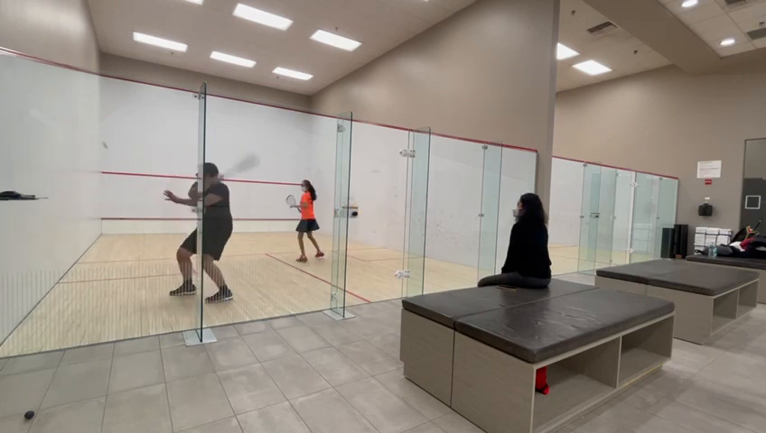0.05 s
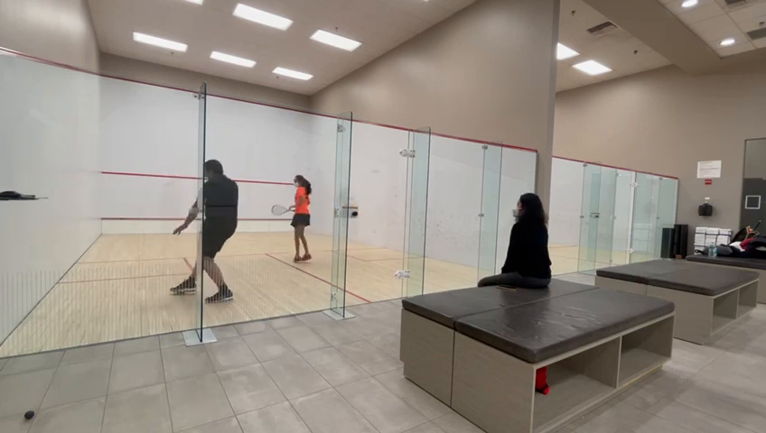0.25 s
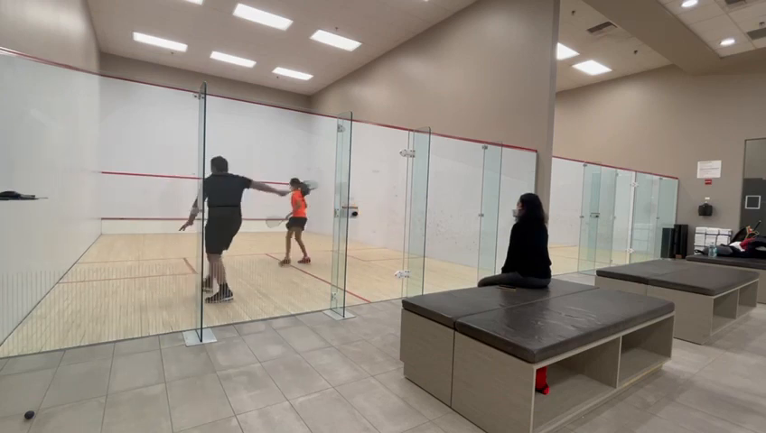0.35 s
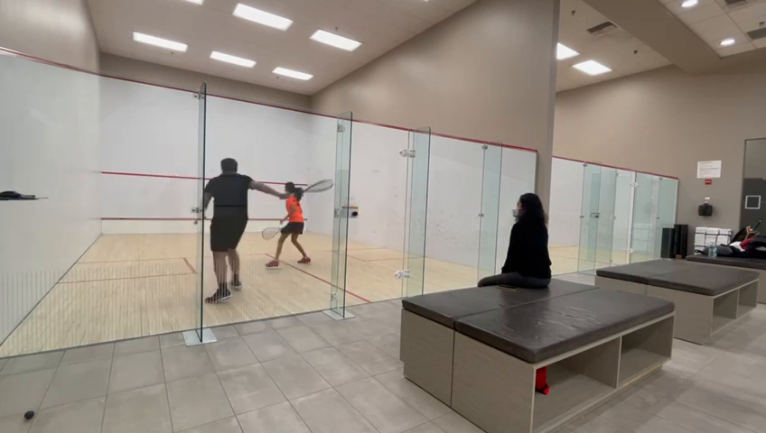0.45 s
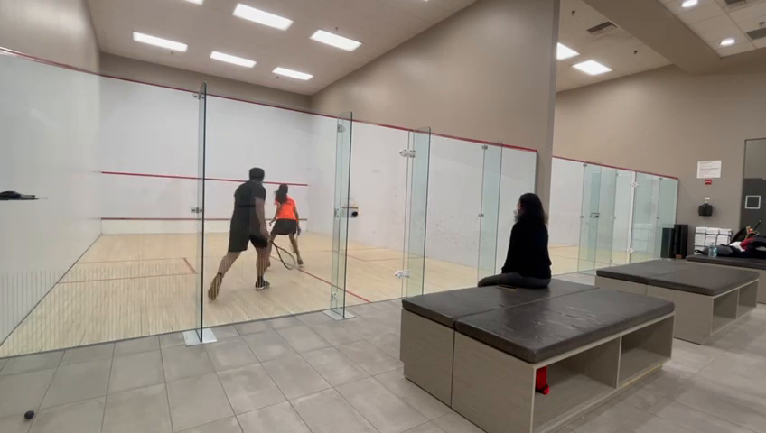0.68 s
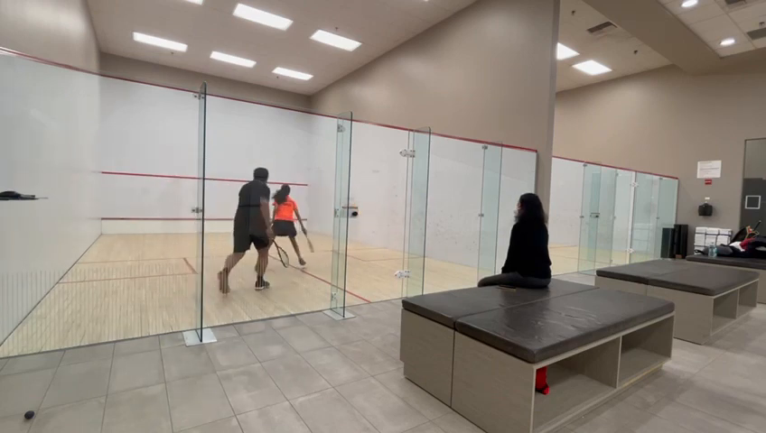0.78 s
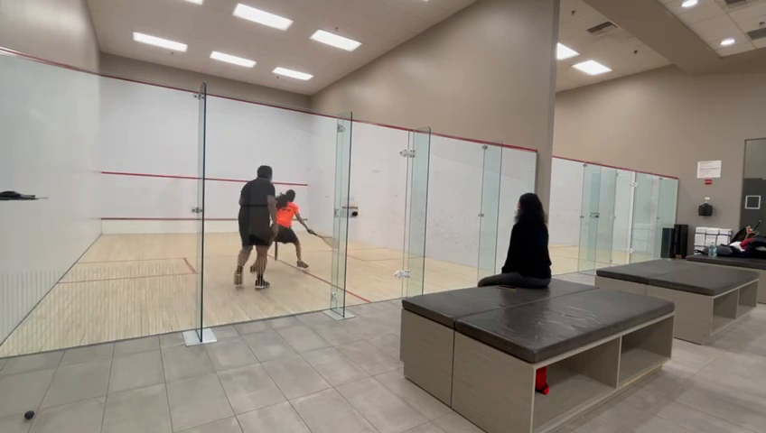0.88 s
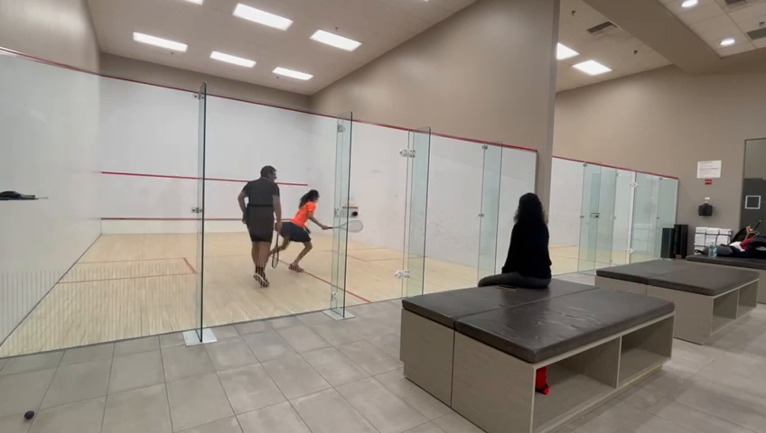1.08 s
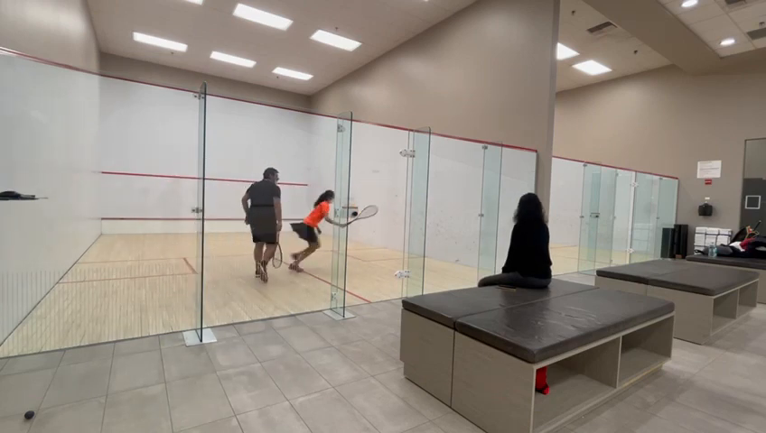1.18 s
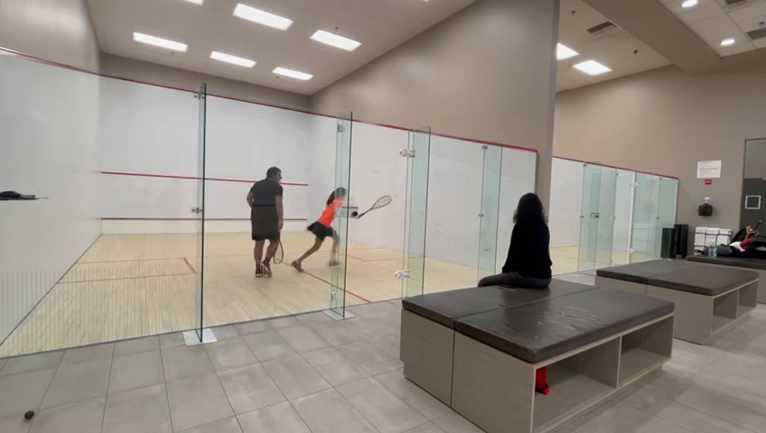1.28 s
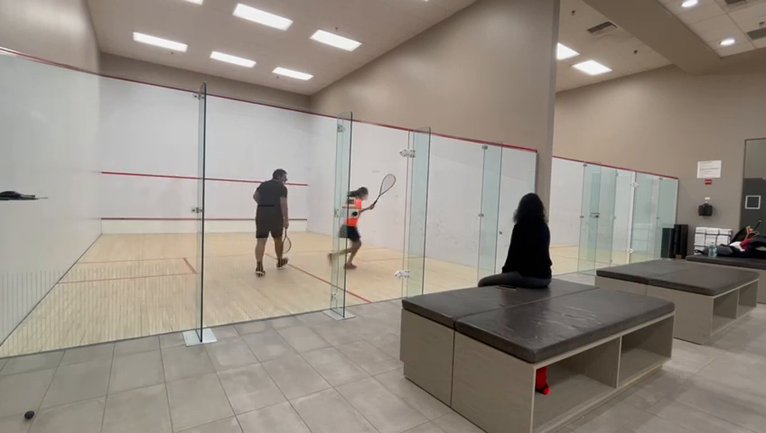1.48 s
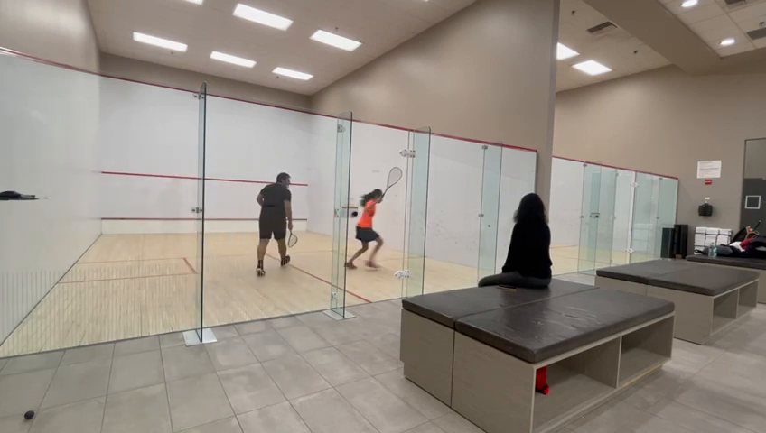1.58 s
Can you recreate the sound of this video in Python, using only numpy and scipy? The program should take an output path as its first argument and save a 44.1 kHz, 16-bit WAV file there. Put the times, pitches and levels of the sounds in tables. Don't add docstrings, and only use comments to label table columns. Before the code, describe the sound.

Squash rally: sharp racket hit, loud wall smack, dull bounces and footsteps in a reverberant hall

```python
import sys
import numpy as np
from scipy import signal
from scipy.fft import rfft, irfft, next_fast_len
from scipy.io import wavfile
from scipy.ndimage import uniform_filter1d, minimum_filter1d

SR = 44100
rng = np.random.default_rng(int(sys.argv[2]) if len(sys.argv) > 2 else 0)


def waveform_to_disk(signal):
    frames = np.transpose(np.atleast_2d(signal))
    scaled = np.clip(frames, -1, 1) * 32767
    samples = np.round(scaled).astype(np.int16)
    wavfile.write(sys.argv[1], SR, samples)


def field_ratio(decibels):
    return 10 ** (np.asarray(decibels, dtype=float) / 20)


N = 72765

# [t/s, level/dB, cluster t60/s, hall level/dB, left over right/dB]
RACKET_HITS = [
    (.233, -16.5, 0.025, -21, 6),
]
SLAPS = [
    (.285, -18, 0.19, -22, 0.5),
    (.304, -43.5, 0.23, -38.5, 31),
]
WALL_HITS = [
    (.398, -12.5, 0.022, -21, 0.65),
]
WALL_RINGS = [
    (.407, -11.5, 0.095, -26.5, 0.49),
]
BOUNCES = [
    (.49, -23, 0.12, -31, 1),
    (.545, -22.5, 0.31, -60, 1.8),
    (.615, -44, 0.082, -51, 1),
    (.865, -32, 0.072, -30, 3.2),
    (.99, -30, 0.31, -32, 0.8),
    (1.1, -35.5, 0.73, -36.5, 0.81),
]
SCUFFS = [
    (.799, -69, 0.074, -56, 3.8),
    (.9, -63, .08, -59.5, 2),
    (1.005, -71, 0.089, -56, 2.3),
    (1.042, -67, 0.081, -55, 3),
    (1.186, -46.5, 0.02, -48, 3.3),
    (1.468, -48.5, 0.18, -58, 2.5),
    (1.58, -70, 0.17, -68, 3),
]
# racket, slap, wall, ring, bounce, scuff [rise/s]
RISES = [0.00067, 0.015, 0.003, 0.0046, 0.016, 0.0023]
# [t/s, level/dB, t60/s, knock level/dB]
STEPS = [(0.0, -37.5, 0.89, -3.5), (0.075, -28.5, 0.48, -12), (.135, -31, 0.52, -5),
         (0.232, -38.5, 0.74, 8), (.4, -41, 0.95, 8.5), (.53, -43.5, 0.45, -1), (.65, -53, 0.18, -17),
         (.76, -42.5, .3, -24), (0.929, -39.5, 0.79, -4.5), (1.03, -36.5, 0.83, -32),
         (1.09, -32, 0.23, -23), (1.189, -39, 0.99, -0.5), (1.249, -40, 0.33, 5.5), (1.31, -46, 0.57, 3),
         (1.417, -32.5, 0.76, 0.5), (1.492, -33.5, 0.62, -1), (1.549, -32, 0.28, -18),
         (1.61, -42, 0.24, 5.5)]
# [t/s, f/Hz, level/dB, t60/s, lead of the left/rad]
PANELS = [(.236, 6500, -17, 0.067, 2.14), (0.223, 1150, -21, 0.078, 0.74), (.237, 1161, -13, 0.075, 1),
          (.244, 348, -15, 0.11, .2), (.272, 356.7, -11, 0.11, 0.24), (.284, 351.4, -1, 0.052, 0.22),
          (.287, 1050, -8.5, 0.057, 1.1), (0.297, 1107, -17.5, 0.084, 0.68),
          (.306, 433, -15.5, 0.087, 0.23), (.333, 380, -17, .05, .2), (0.336, 1254, -17, 0.088, 0.67),
          (0.345, 328, -18.5, 0.061, 0.23), (.36, 401, -13, 0.064, 0.22), (.392, 1230, -10, 0.051, .8),
          (.394, 880, -17, 0.089, 1.1), (.401, 271, -13.5, 0.094, 0.14), (.404, 1882, -9.5, 0.055, 0.56),
          (.405, 2397, -18.5, 0.065, 0.91), (.408, 1510, -15, 0.06, 0.69), (.403, 2113, -8, 0.039, .8),
          (0.401, 3420, -17.5, 0.068, 0.74), (0.419, 1027, -14.5, 0.077, 1.5),
          (0.419, 148, -30.5, 0.17, 0.086), (.452, 642, -9, 0.036, .5), (.462, 415, -12, 0.057, 0.31),
          (.494, 1150, -19, 0.091, .8), (1.005, 4250, -49, .05, 0.72), (1.18, 783, -28, 0.13, 1.2),
          (1.185, 3930, -36, 0.021, 0.74), (1.186, 4700, -49, .02, .8), (1.187, 6500, -49, .02, .8)]
# [f/Hz, level per Hz/dB]
RACKET_TONE = [(88, -48.5), (150, -4.5), (650, -5), (1170, -3.5), (1790, -12), (3170, -11.5), (5530, -17.5),
               (6530, -6.5), (7430, -23), (10000, -23.5), (12000, -21), (13000, -38), (16200, -84),
               (22000, -120)]
SLAP_TONE = [(88, -77.5), (150, -32.5), (371, -5.5), (558, -13.5), (1090, -1.5), (1760, -10), (8160, -25),
             (9460, -26.5), (12500, -136), (16200, -166), (22000, -120)]
WALL_TONE = [(88, -49), (150, -9.5), (1130, -6), (2200, -6), (3170, -11.5), (4950, -13.5), (5530, -14.5),
             (8620, -11.5), (10200, -15), (10800, -50), (11600, -48), (12500, -82), (16200, -99),
             (22000, -120)]
RING_TONE = [(88, -59.5), (150, -15), (919, 0), (1630, -15.5), (1930, -3), (3750, -21.5), (9630, -22.5),
             (11000, -60.5), (12500, -92), (16200, -128), (22000, -120)]
BOUNCE_TONE = [(150, -10.5), (350, -8), (800, 4), (1400, -1.5), (2200, -8.5), (3200, -16.5), (4500, -31.5),
               (12000, -76.5)]
SCUFF_TONE = [(500, -31), (2000, 1.5), (4000, 4), (6500, 0), (9000, -3.5), (12500, 0.5)]
AIR_TONE = [(18, -36), (30, -16.5), (69, -16.5), (256, -17), (306, -20), (905, -18.5), (2550, -36.5),
            (8770, -55), (12500, -45), (16200, -109), (22000, -120)]
# [f/Hz, width/Hz, gain/dB]
RACKET_MODES = [(6500, 590, -4.5), (8150, 760, 16.5), (1150, 150, -1.5), (2850, 1500, 2.5)]
SLAP_MODES = [(342, 150, 1), (1040, 50, -1.6), (450, 37, 0.93)]
RING_MODES = [(2110, 81, 3.2), (1040, 650, 0.19), (1480, 320, -1)]
PORT_NOTCHES = [(5580, 355, -8), (7380, 270, -12), (10600, 95, -1.5)]
# [f/Hz, t60/s, level/dB, left-right likeness (-1 to 1), left over right/dB]
HALL = [(30, 1.2, -15, 0.85, -4), (60, 1.2, -5, 0.94, -4), (186, 2.1, -12, 0.74, -0.5),
        (375, 1.61, 3.5, 0.45, 0), (743, 2.43, 2.5, -0.25, 2), (1526, 2.3, 1, 0.087, 3),
        (2250, 1.54, -1, -0.15, 3), (3260, 1.35, -5.5, -0.15, 2.5), (6120, 0.8, -5.5, 0.099, 8.5),
        (10600, 0.38, -3, -0.27, -2.5)]
# [t/s, level/dB]
AIR_LEVEL = [
    (.25, -3.5),
    (.7, -3),
    (.88, -3),
    (1.2, 2),
]
# [t/s, f/Hz, level/dB, length/s, left over right/dB]
BIRDIES = [
    (.408, 11140, -45.5, 0.022, 8),
    (0.445, 11560, -52, 0.013, 6),
    (.548, 11570, -63, 0.02, 8),
]

SIZE = next_fast_len(N + 8192, True)
HZ = np.maximum(np.arange(SIZE // 2 + 1) * SR / SIZE, 1)
T = np.arange(N) / SR


def unit(x):
    return x / np.sqrt(np.mean(x ** 2))


def read(table, hz, axis=1):
    table = np.array(table)
    return np.interp(np.log(hz), np.log(table[:, 0]), table[:, axis])


def bumps(modes):
    return sum(db / (1 + (2 * (HZ - hz) / width_hz) ** 2) for hz, width_hz, db in modes)


def colour(x, db):
    gain = field_ratio(db)
    gain = gain / np.sqrt(np.mean(gain ** 2))
    return irfft(rfft(x, SIZE) * gain, SIZE)[..., :N]


def pan(db):
    return field_ratio(np.array([[db], [-db]]) / 2)


def pair(a, b):
    likeness = np.clip(read(HALL, HZ, axis=3), -.999, .999)
    balance = field_ratio(read(HALL, HZ, axis=4) / 2)
    mid = rfft(a, SIZE) * np.sqrt((1 + likeness) / 2)
    side = rfft(b, SIZE) * np.sqrt((1 - likeness) / 2)
    return irfft(np.array([(mid + side) * balance, (mid - side) / balance]), SIZE)[:, :N]


def noise_pair():
    return pair(*rng.standard_normal((2, N)))


def echoes():
    echoes_per_s, scatter_db = 9000, 3.5
    happens = rng.random((2, N)) < echoes_per_s / SR
    sign = rng.choice([-1, 1], (2, N))
    return unit(happens * sign * field_ratio(scatter_db * rng.exponential(size=(2, N))))


def hall_bands():
    out = []
    for hz in 45 * 2 ** np.arange(0, 8.6, .5):
        window = np.cos(np.clip(np.log2(HZ / hz) * np.pi, -np.pi / 2, np.pi / 2))
        out.append((window, read(HALL, hz), read(HALL, hz, axis=2)))
    return out


def near_reflections(hits, rise_s):
    lead_db, lead_s = -10.5, 0.0094
    crack_db, crack_s, hold_s = -4.5, 0.0019, 0.0051
    clicks, level = pair(*echoes()), 0
    for s, level_db, t60, _, pan_db in hits:
        d = T - s
        before, after = np.minimum(d, 0), np.maximum(d, 0)
        swell = np.exp(before / rise_s) + field_ratio(lead_db) * np.exp(before / lead_s)
        fade = field_ratio(-60 * np.maximum(d - hold_s, 0) / max(t60, .01))
        fade = fade + field_ratio(crack_db) * np.exp(-after / crack_s)
        level = level + field_ratio(level_db) * np.where(d > 0, fade, swell) * pan(pan_db)
    return level * clicks


def hall_tail(hits, bands):
    fill_s = 0.0082
    spectrum, far = rfft(noise_pair(), SIZE), 0
    late = np.array([np.maximum(T - row[0], 0) for row in hits])
    power = field_ratio(2 * np.array(hits)[:, 3:4]) * (1 - np.exp(-late / fill_s))
    for window, t60, hall_db in bands:
        env = np.sqrt(np.sum(power * field_ratio(-120 * late / max(t60, .05)), axis=0))
        far = far + field_ratio(hall_db) * env * irfft(spectrum * window, SIZE)[:, :N]
    return far


def blows(hits, db, rise_s, bands):
    low_cut_db = -10 * np.log10(1 + (200 / HZ) ** 8)
    return colour(near_reflections(hits, rise_s) + hall_tail(hits, bands), db + low_cut_db)


def racket(bands):
    return blows(RACKET_HITS, read(RACKET_TONE, HZ) + bumps(RACKET_MODES), RISES[0], bands)


def slap(bands):
    return blows(SLAPS, read(SLAP_TONE, HZ) + bumps(SLAP_MODES), RISES[1], bands)


def wall_hit(bands):
    return blows(WALL_HITS, read(WALL_TONE, HZ), RISES[2], bands)


def wall_ring(bands):
    return blows(WALL_RINGS, read(RING_TONE, HZ) + bumps(RING_MODES), RISES[3], bands)


def bounces(bands):
    return blows(BOUNCES, read(BOUNCE_TONE, HZ), RISES[4], bands)


def scuffs(bands):
    return blows(SCUFFS, read(SCUFF_TONE, HZ), RISES[5], bands)


def panels():
    rise_s, wobble_db = 0.0025, 0.5
    out = 0
    for s, hz, level_db, t60, lead in PANELS:
        d = np.maximum(T - s, 0)
        wobble = unit(uniform_filter1d(rng.standard_normal((2, N)), size=300))
        env = field_ratio(level_db - 60 * d / t60 + wobble_db * wobble) * (1 - np.exp(-d / rise_s))
        out = out + env * np.sin(2 * np.pi * hz * d + np.array([[lead], [0]]))
    return out


def floor_note(hz, width_hz):
    x = unit(colour(noise_pair(), -20 * np.log10(1 + (2 * (HZ - hz) / width_hz) ** 2)))
    return unit(x / np.sqrt(uniform_filter1d(np.mean(x ** 2, axis=0), size=900) + 0.073))


def steps():
    boom, knock = floor_note(62.3, 25.5), floor_note(138.4, 151)
    s, level_db, t60, knock_db = np.array(STEPS).T[:, :, None]
    d = np.maximum(T - s, 0)
    env = field_ratio(level_db - 60 * d / t60) * (1 - np.exp(-d / 0.0015))
    boom_level = np.sqrt(np.sum(env ** 2, axis=0))
    knock_level = np.sqrt(np.sum((env * field_ratio(knock_db)) ** 2, axis=0))
    return boom_level * boom + knock_level * knock


def air():
    opening_db, opening_s = 5.5, 0.088
    level_db = -39 + np.interp(T, *np.array(AIR_LEVEL).T) + opening_db * np.exp(-T / opening_s)
    return field_ratio(level_db) * unit(colour(noise_pair(), read(AIR_TONE, HZ)))


def thin(x):
    blotch_db, patch_db, patch_under_db, patch_from_hz = 3.5, -22, -4, 900
    squelch_hz, squelch_db, squelch_scatter_db, edge_wander_hz = 8990, -15, 2, 920
    chirp_hz, chirp_share, chirp_under_db = 11530, .3, -72
    noise_db, side_cut_hz, top_hz = -93, 125, 12700
    shape = dict(window="cosine", nperseg=2048, noverlap=1024)
    hz, t, z = signal.stft(np.array([x[0] + x[1], x[0] - x[1]]) / 2, SR, **shape)
    column = hz[:, None]

    blotch = uniform_filter1d(rng.standard_normal(z.shape), size=4, axis=1)
    blotch = unit(uniform_filter1d(blotch, size=3, axis=2))
    blotch = blotch - uniform_filter1d(blotch, size=15, axis=2)
    z = z * field_ratio(blotch_db * blotch * np.clip(column / patch_from_hz, 0, 1) - blotch_db ** 2 / 12.5)

    power = np.abs(z) ** 2
    band = uniform_filter1d(uniform_filter1d(power, size=6, axis=1), size=2, axis=2)
    wide = uniform_filter1d(power, size=41, axis=1)
    chance = rng.random((len(hz) // 24 + 1, len(t))).repeat(24, axis=0)[:len(hz)]

    mask = np.mean(power[:, (hz > 300) & (hz < 8000)], axis=(0, 1)) * field_ratio(2 * squelch_db)
    slope = np.clip((column - squelch_hz) / 1500, 0, 1)
    mask = np.minimum(mask, field_ratio(2 * noise_db) + mask * slope) * field_ratio(2 * squelch_scatter_db * chance)
    near_chirp = np.abs(np.abs(column - chirp_hz) - 170) < 70
    spared = near_chirp & (chance < chirp_share) & (mask < field_ratio(2 * chirp_under_db))
    loud = uniform_filter1d(power.mean(axis=0), size=24, axis=0) > mask
    below_edge = column < squelch_hz + edge_wander_hz * chance[0] ** 2
    keep = (loud | below_edge | spared) & (column < top_hz)

    valley = (band < wide * field_ratio(2 * patch_under_db)) & (column > patch_from_hz)
    patch = np.where(valley, field_ratio(patch_db), 1)
    side_gain = 1 / (1 + (side_cut_hz / np.maximum(hz, 1)) ** 3)
    narrow = np.array([np.ones(len(hz)), side_gain])[:, :, None]
    mid, side = signal.istft(z * keep * patch * narrow, SR, **shape)[1][:, :N]
    return np.array([mid + side, mid - side])


def limit(x):
    ceiling = .86
    gain = ceiling / np.maximum(np.abs(x).max(axis=0), ceiling)
    gain = minimum_filter1d(gain, size=121)
    return x * uniform_filter1d(uniform_filter1d(gain, size=60), size=60)


def birdies():
    out = 0
    for s, hz, level_db, length, pan_db in BIRDIES:
        env = np.exp(-((T - s) / length) ** 4)
        out = out + field_ratio(level_db) * pan(pan_db) * env * np.sin(2 * np.pi * hz * T)
    return out


def scene():
    bands = hall_bands()
    ball = racket(bands) + slap(bands) + wall_hit(bands) + wall_ring(bands) + bounces(bands)
    return ball + scuffs(bands) + panels() + steps() + air()


def top_cut(x):
    return signal.sosfilt(signal.butter(12, 12630, fs=SR, output="sos"), x)


def record(dry):
    x = colour(dry, bumps(PORT_NOTCHES))
    x = limit(thin(x)) + birdies()
    return top_cut(x)


dry = scene()
out = record(dry)
waveform_to_disk(out)
```